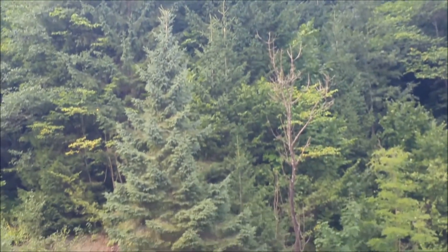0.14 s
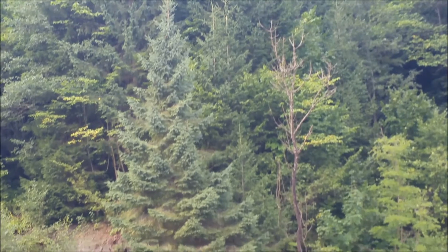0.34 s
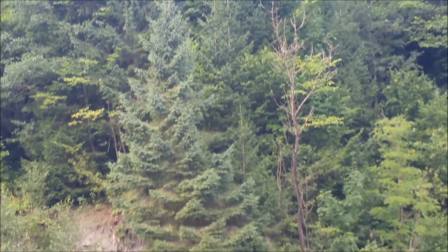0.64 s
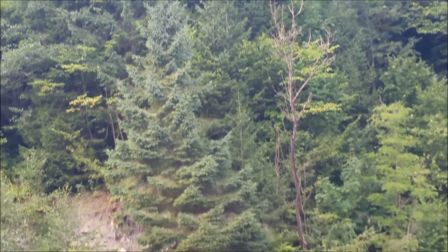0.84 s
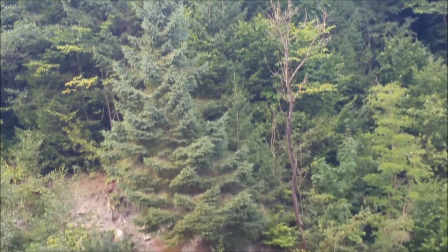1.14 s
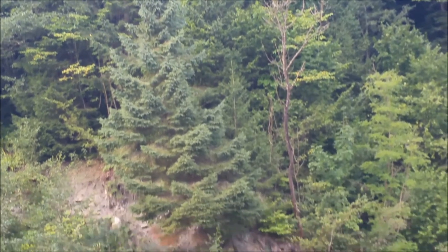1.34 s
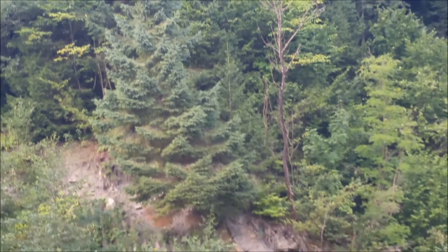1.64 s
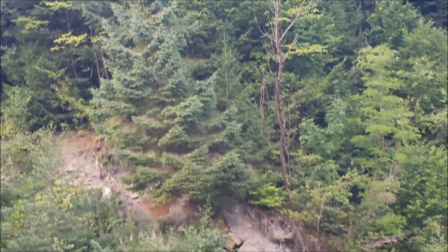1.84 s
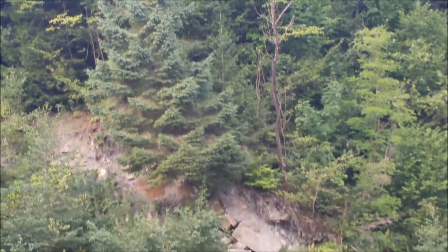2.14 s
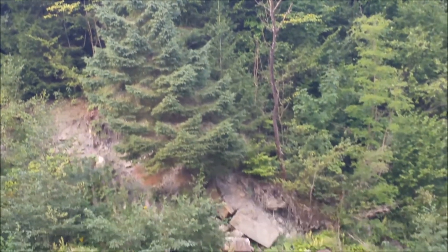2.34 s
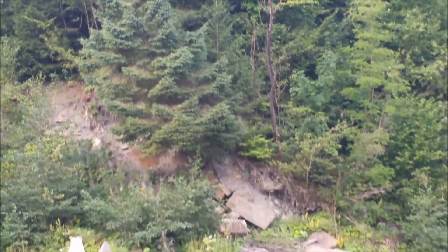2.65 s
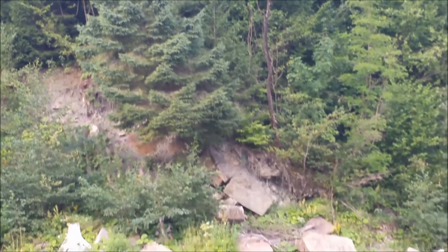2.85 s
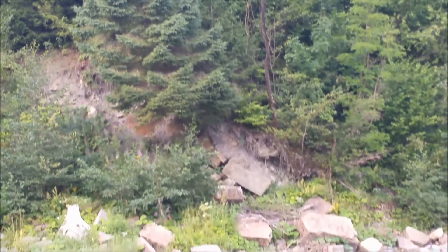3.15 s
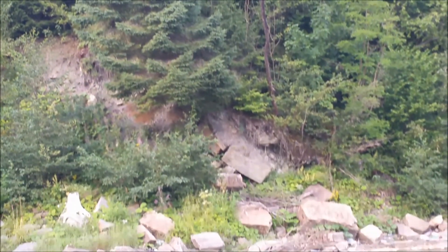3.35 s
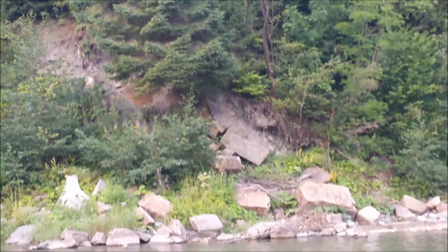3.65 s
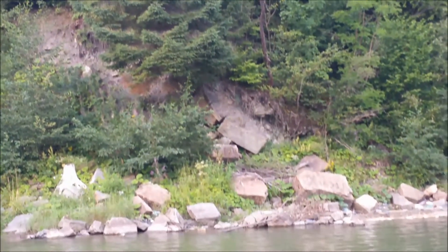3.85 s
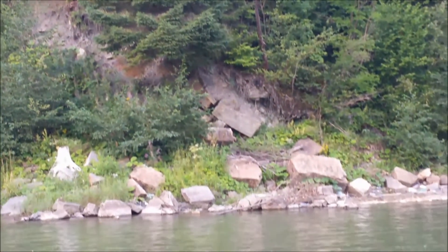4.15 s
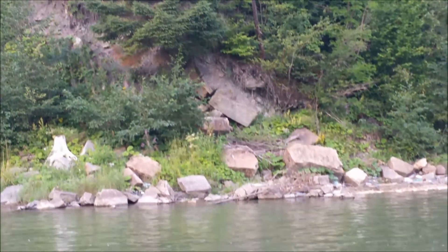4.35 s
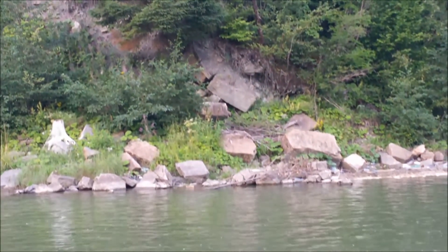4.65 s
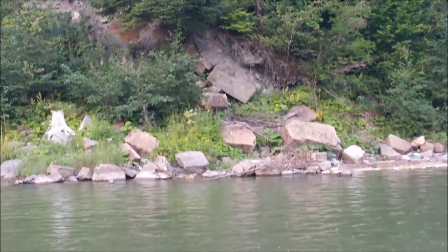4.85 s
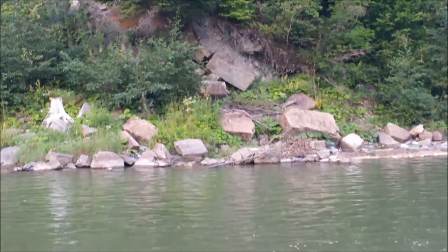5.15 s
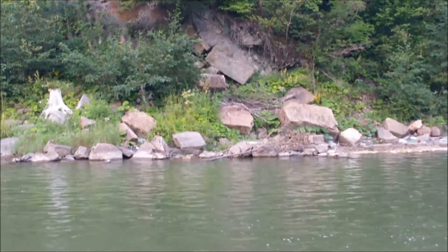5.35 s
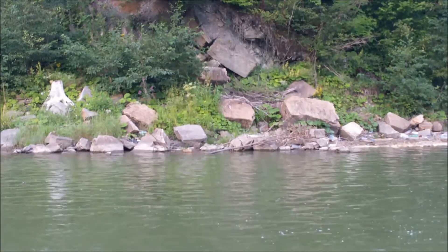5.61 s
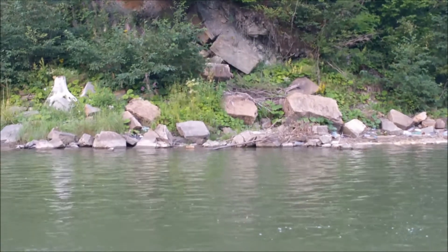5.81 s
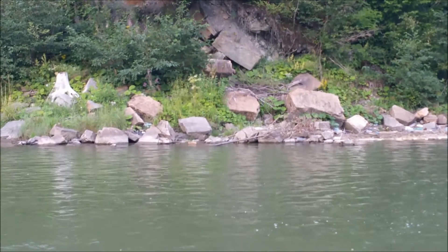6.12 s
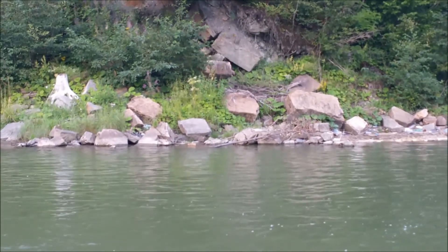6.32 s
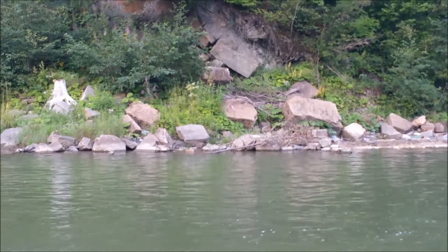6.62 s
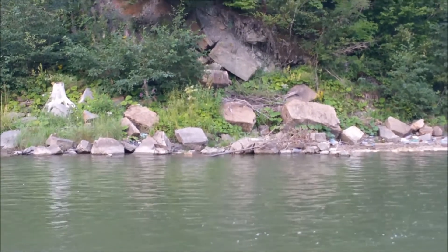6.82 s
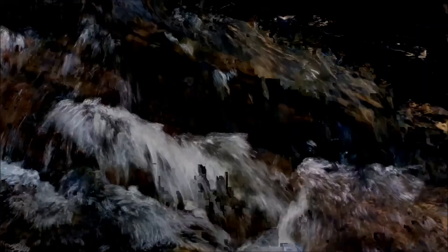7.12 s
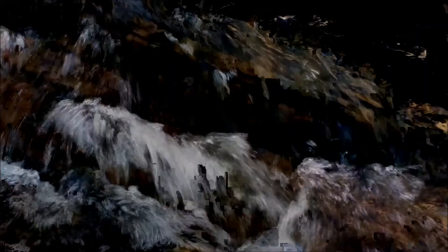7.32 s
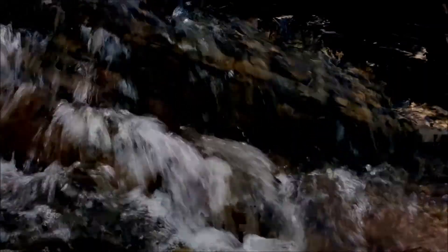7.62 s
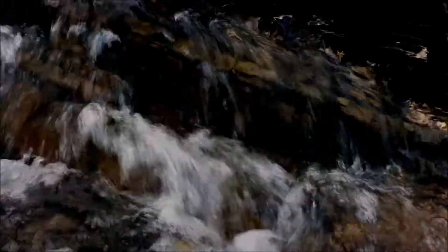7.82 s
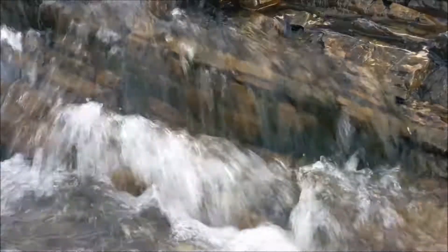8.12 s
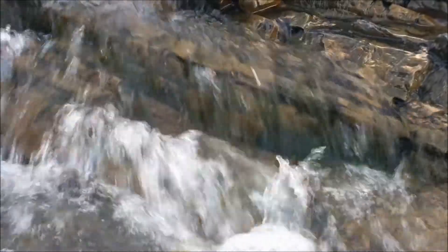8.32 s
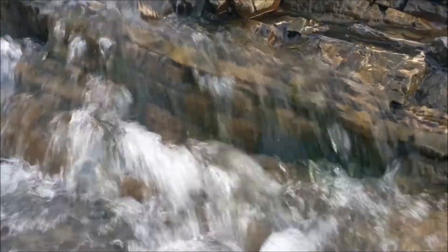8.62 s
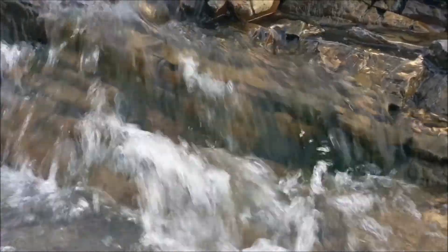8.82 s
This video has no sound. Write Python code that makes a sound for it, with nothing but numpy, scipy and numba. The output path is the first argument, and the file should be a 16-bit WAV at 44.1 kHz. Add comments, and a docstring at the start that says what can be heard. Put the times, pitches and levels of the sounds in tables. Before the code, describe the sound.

Steady far rapids over a faint low hum die away; after a short gap, a near little waterfall rises, splashing and plopping.

```python
"""Distant rapids, then a near cascade

A broad river roars evenly over distant rapids, to the right, over a faint low drone, and the scene fades out.
After a short silence the scene changes: a small cascade fades in close by, splashing in spurts and throwing
loud plops. Both waters are clouds of ringing air bubbles in a wash of foam, reaching two microphone ports from
many directions; the drone is two wavering sines, the plunge pool is band-passed noise."""
import sys
import numpy as np
from scipy import signal
from scipy.fft import rfft, irfft, next_fast_len
from scipy.io import wavfile
from numba import njit

SR = 44100
rng = np.random.default_rng(int(sys.argv[2]) if len(sys.argv) > 2 else 0)


def put_to_file(sound):
    """Save the sound as 16-bit audio at rate SR, in the file named by the first command-line argument."""
    columns = np.atleast_2d(sound).T  # one column per channel
    safe = np.clip(columns, -1, 1)
    whole_steps = np.round(safe * 32767)
    wavfile.write(sys.argv[1], SR, whole_steps.astype(np.int16))


N = 395577

# tones of the low drone: [f/Hz, relative level/dB]
DRONE_TONES = [(58.8, 2.5), (42.5, -10)]
# colour of the far river at the two ports: [f/Hz, left relative level/dB, right relative level/dB]
RIVER_COLOUR = [(25, -27, -32), (76.3, -8.5, -13), (147, -4, -7), (218, -3.5, -7), (315, 0.5, -1),
                (544, -0.5, -5), (686, -6.5, -6.5), (915, -4.5, -6), (1380, -8, -10), (2540, -15, -7.5),
                (3346, -19.5, -16), (5000, -24.5, -22.5), (6230, -33, -27), (7600, -35, -40),
                (12300, -42.5, -42.5), (13500, -45.5, -46)]
# river delay, left port behind right, longest where sound bends round the housing: [f/Hz, delay/ms]
RIVER_LAG = [(300, 0.39), (700, 0.41), (1000, .36), (2000, 0.37), (3200, 0.321)]
# the river's brightness above 1 kHz, duller by 2.5 s, then brighter again: [t/s, tilt/(dB per octave)]
RIVER_TILT = [(0, 0.47), (2.5, 0.23), (4.3, 0.47), (7, 0.65)]
# colour of the near cascade at the two ports: [f/Hz, left relative level/dB, right relative level/dB]
CASCADE_COLOUR = [(30, -42, -50), (169, -18.5, -25.5), (395, -13.5, -15.5), (500, -7, -12), (724, -10, -11),
                  (1110, -8.5, -7), (1430, -9, -8), (2180, -13, -3), (2680, -12.5, .5), (3290, -17.5, -5.5),
                  (4260, -16.5, -9), (6500, -27.5, -16.5), (7240, -29, -26.5), (15500, -33, -36)]
# cascade delay, left port behind right (negative: left hears it first): [f/Hz, delay/ms]
CASCADE_LAG = [(600, -0.23), (1050, -0.095), (1400, -0.35), (3000, -0.306)]
# big single bubbles at the foot of the cascade: [t/s, level before filter and port gains/dB, starting f/Hz]
PLOPS = [(8.2162, -31, 2350), (8.3714, -25, 2730), (8.4103, -26, 2520), (8.4704, -25, 2760),
         (8.5954, -20.5, 2760), (8.6094, -20, 3060), (8.6504, -23, 2540), (8.6757, -21, 2900),
         (8.7534, -21, 2310), (8.8844, -20, 3420), (8.9136, -17.5, 2480), (8.9351, -14, 2860),
         (8.9454, -22, 2700)]

TIME = np.arange(N) / SR
FFT_SIZE = next_fast_len(N)
BIN_HZ = np.maximum(np.arange(FFT_SIZE // 2 + 1) * SR / FFT_SIZE, 1)

# the low drone rises, holds and sinks to a fainter hum
DRONE_DB, DRONE_SINK_DB, DRONE_DECAY_DB_PER_S = -57.5, 13, 6.5
DRONE_START_S, DRONE_ATTACK_S, DRONE_HOLD_S = 0.1, 0.43, 1.4
# the river flows evenly, then the scene fades in a straight line to silence
RIVER_DB, RIVER_GONE_S, FADE_OUT_S = -37.5, 7.092, 2.5
# the cascade and its pool fade in from silence, in a straight line
POOL_DB, CASCADE_DB, CASCADE_START_S, FADE_IN_S = -54, -29, 7.457, 1.31
# partway in, the cascade swells to full strength
SWELL_START_S, SWELL_LENGTH_S, SWELL_DB = 8.057, 0.34, 11
PLOP_LOW_CUT_HZ, PLOP_HIGH_CUT_HZ = 150, 7000
TOP_HZ = 15650  # upper limit of the recorder


def undb(db):
    """Decibels to gain."""
    return 10 ** (np.asarray(db) / 20)


def unit(x):
    """Scale to rms 1."""
    return x / np.sqrt(np.mean(x ** 2))


def ramp(start, length):
    """Rise in a straight line from 0 to 1, then hold."""
    return np.clip((TIME - start) / length, 0, 1)


def over_pitch(hz, points, values):
    """Join values by straight lines on a log-frequency axis."""
    return np.interp(np.log(hz), np.log(points), values)


def shape(x, response):
    """Filter by a response given at BIN_HZ."""
    return irfft(rfft(x, FFT_SIZE) * response, FFT_SIZE)[..., :N]


def walk(rate):
    """Random curve of rms 1: straight lines between chance values, rate of them a second."""
    steps = rng.standard_normal(4096)
    return unit(np.interp(TIME * rate, np.arange(len(steps)), steps))


@njit
def ring(start, lag, hz, cycles, size, rise):
    """Each bubble is a dying sine whose pitch climbs as it nears the surface; the left port hears it lag s later."""
    out = np.zeros((2, N))
    for k in range(len(start)):
        life = cycles[k] / hz[k] * SR  # samples to die by 60 dB
        turn = 2 * np.pi * hz[k] / SR  # radians per sample
        glide = np.exp(1j * turn * rise / life)
        for port in range(2):
            at = (start[k] + lag[k] * (1 - port)) * SR
            first = int(np.ceil(at))
            pole = np.exp(1j * turn - np.log(1000) / life)
            # the phase keeps the start exact between samples
            z = size[k] * np.exp(1j * turn * (first - at))
            for i in range(max(first, 0), min(first + int(life * .6), N)):
                out[port, i] += z.imag
                z *= pole
                pole *= glide
    return out


def bubbles(t0, t1, count, cycles, scatter_db, spread_ms, rise):
    """A cloud of bubbles with even power per Hz: many small, few large, each from its own direction."""
    when, radius, strength, damping, side = rng.random((count, 5)).T
    low, high = np.sqrt(130), np.sqrt(15000)  # pitch limits, as roots of Hz
    hz = (low + radius * (high - low)) ** 2
    loud = -np.log(1 - .995 * strength)
    size = hz ** (3 / 4) * undb(scatter_db * loud) * rng.choice([-1, 1], count)
    # short delays between the ports are common, long ones rare
    lag = spread_ms / 1000 * np.sign(side - .5) * np.log(np.abs(2 * side - 1))
    cloud = ring(t0 + (t1 - t0) * when, lag, hz, cycles * (.5 + damping), size, float(rise))
    return unit(cloud) * np.sqrt((t1 - t0) * SR / N)  # rms 1 while the cloud lasts


def foam(spread_ms, flicker_db, flicker_rate):
    """Countless merged bursts: broad bands that flicker on their own, alike at both ports only in the bass."""
    likeness = 1 / (1 + (2 * np.pi * BIN_HZ * spread_ms / 1000) ** 2)
    mid = np.sqrt(1 + likeness) * np.exp(2j * np.pi * rng.random(len(BIN_HZ)))
    side = np.sqrt(1 - likeness) * np.exp(2j * np.pi * rng.random(len(BIN_HZ)))
    wash = np.array([mid + side, mid - side])
    centres = [300, 900, 2700, 8000]  # Hz
    total = np.zeros((2, N))
    for own in np.eye(len(centres)):
        band = irfft(wash * over_pitch(BIN_HZ, centres, own), FFT_SIZE)[:, :N]
        total += band * undb(flicker_db * walk(flicker_rate))
    return unit(total)


def ports(x, colour, lag):
    """Give each port its colour and delay the left one; an even input of rms 1 stays at rms 1."""
    hz, *sides = np.transpose(colour)
    left, right = unit(np.array([undb(over_pitch(BIN_HZ, hz, db)) for db in sides]))
    delay_s = over_pitch(BIN_HZ, *np.transpose(lag)) / 1000
    return shape(x, np.array([left * np.exp(-2j * np.pi * BIN_HZ * delay_s), right]))


def drone():
    """Two faint low sines wavering in pitch and level, perhaps a motor far up the valley."""
    tones = np.zeros(N)
    for hz, db in DRONE_TONES:
        wavering_hz = hz + 0.84 * walk(2.6)
        tones += undb(db) * np.sin(2 * np.pi * np.cumsum(wavering_hz) / SR)
    dying_s = np.maximum(TIME - DRONE_START_S - DRONE_ATTACK_S - DRONE_HOLD_S, 0)
    sink_db = np.minimum(DRONE_DECAY_DB_PER_S * dying_s, DRONE_SINK_DB)
    envelope = ramp(DRONE_START_S, DRONE_ATTACK_S) * undb(DRONE_DB - sink_db)
    return unit(tones) * envelope * undb(1.2 * walk(4.2)) * undb([[1.5], [-2]])


def river():
    """Far rapids to the right: bubbles so many that they merge into a steady roar."""
    spread_ms = 0.065
    cloud = bubbles(0, 7.1, count=45000, cycles=24.5, scatter_db=2.0, spread_ms=spread_ms, rise=0.1)
    water = unit(foam(spread_ms, flicker_db=0.5, flicker_rate=22) + undb(-4) * cloud)
    # the wooded bank scatters a little of the roar back from all sides
    water = water + undb(-18) * rng.standard_normal((2, N))
    roar = ports(water, RIVER_COLOUR, RIVER_LAG)
    # a small tilt above 1 kHz adds the sound weighted by its octave
    octaves = np.log2(np.maximum(BIN_HZ, 1000) / 1000)
    tilt_db = np.interp(TIME, *np.transpose(RIVER_TILT))
    roar = roar + (undb(tilt_db) - 1) * shape(roar, octaves)
    return roar * undb(RIVER_DB + 0.15 * walk(5))


def pool():
    """Clouds of air pulse as a whole in the plunge pool: a soft low churning."""
    centre_hz = 270
    response = 1 / (1 + (BIN_HZ / centre_hz - centre_hz / BIN_HZ) ** 2 / 2)
    churn = shape(rng.standard_normal(N), response)
    return unit(churn) * undb(POOL_DB) * undb([[1], [-2]])


def cascade():
    """A near chute of water: spurts drive air under, and single bubbles stand out of the foam."""
    spread_ms = 0.142
    cloud = bubbles(7.4, 9, count=14000, cycles=36, scatter_db=2.5, spread_ms=spread_ms, rise=0.17)
    water = undb(-3.5) * foam(spread_ms, flicker_db=0.5, flicker_rate=51) + undb(-4) * cloud
    spurts = undb(0.5 * walk(70))
    # the chute slackens for an instant between its two biggest plops
    lull = undb(-6 * np.exp(-((TIME - 8.926) / 0.008) ** 2))
    swell_db = SWELL_DB * (ramp(SWELL_START_S, SWELL_LENGTH_S) - 1)
    return ports(water * spurts, CASCADE_COLOUR, CASCADE_LAG) * lull * undb(CASCADE_DB + swell_db)


def plops():
    """The biggest bubbles pinch off close to the right port and ring for a few milliseconds."""
    start, db, hz = np.transpose(PLOPS)
    each = np.ones(len(start))
    rings = ring(start, 0.00045 * each, hz, 32 * each, undb(db), 0.088)
    # the neck closes over several samples, which softens the attack
    soft_attack = 1 / (1 + (BIN_HZ / PLOP_HIGH_CUT_HZ) ** 4)
    # so small a bubble radiates no bass
    bass_cut = 1 / (1 + (PLOP_LOW_CUT_HZ / BIN_HZ) ** 2)
    return shape(rings, soft_attack * bass_cut) * undb([[-7], [3]])


def scene():
    """The scene with the river and its drone fades out, then the scene with the cascade and its pool fades in,
    and plops are thrown."""
    fade_out = 1 - ramp(RIVER_GONE_S - FADE_OUT_S, FADE_OUT_S)
    fade_in = ramp(CASCADE_START_S, FADE_IN_S)
    far = (drone() + river()) * fade_out
    near = (pool() + cascade()) * fade_in
    return far + near + plops()


def record(dry):
    """The recorder cuts the top steeply."""
    return signal.sosfilt(signal.ellip(12, .1, 70, TOP_HZ, fs=SR, output="sos"), dry)


dry = scene()
out = record(dry)
put_to_file(out)
```